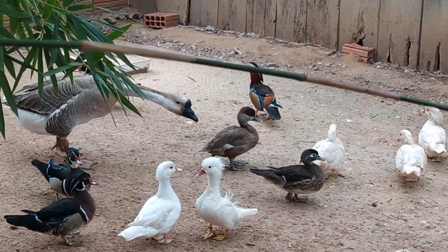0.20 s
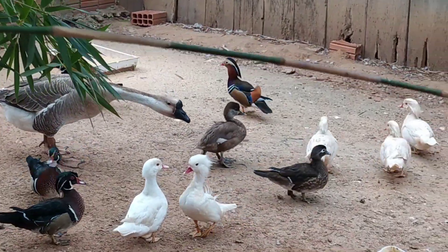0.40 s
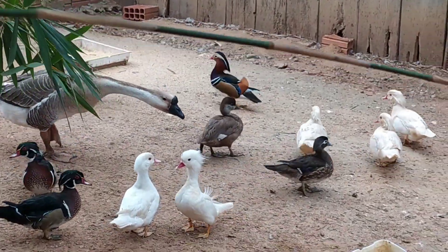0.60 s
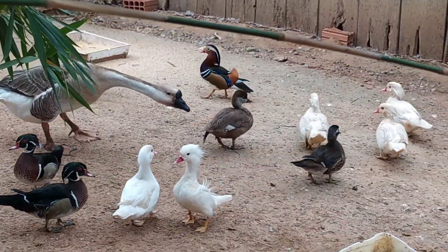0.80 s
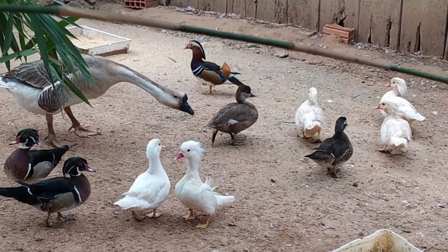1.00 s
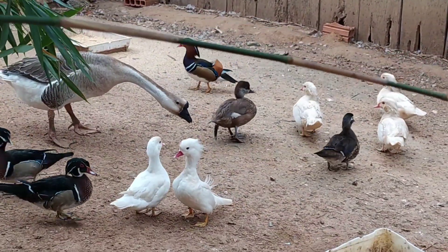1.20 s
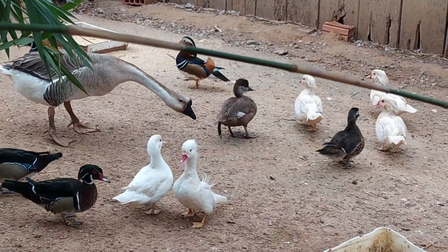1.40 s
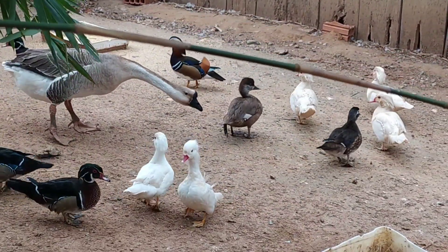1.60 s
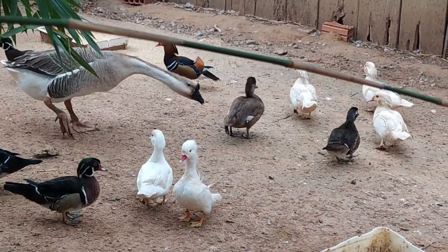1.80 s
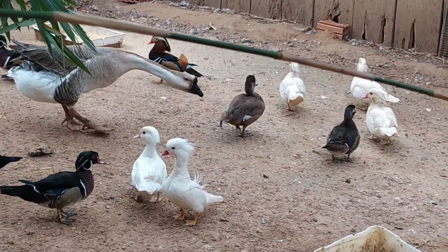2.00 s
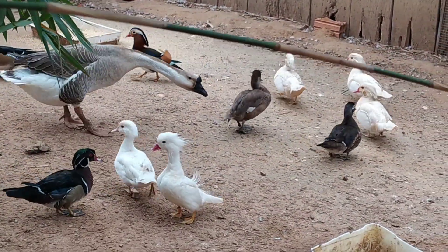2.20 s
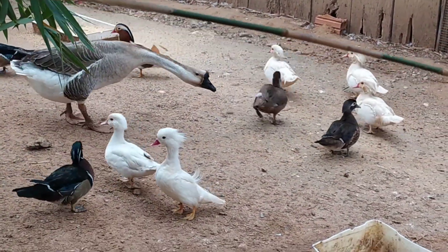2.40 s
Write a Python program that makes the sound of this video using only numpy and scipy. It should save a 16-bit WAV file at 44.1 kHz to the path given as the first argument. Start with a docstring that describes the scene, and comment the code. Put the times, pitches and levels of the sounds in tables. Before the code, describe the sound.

A goose honks loudly and close: from 0.2 to 0.8 s a low grunt cracks into a higher raspy, brassy cry; from 1.5 to 2.25 s another grunt and two cries follow. Very soft rising airy duck whistles come at the start, near 1.5 and 2.4 s. Feet faintly scuff grit around 1.0 and 1.35 s, with sharp ticks near 2.5 s. Quick yard echoes, faint outdoor hush.

```python
"""In a yard, a goose gives five honks in two bouts; each bout is a low grunt that breaks up into a raspy cry.
Pulses of its syrinx (voice organ) and puffs of air ring the narrow resonances of its long windpipe.
Three times a small duck gives a rising whistle, a gliding tone with airy noise, over a soft grunt of low noise.
Feet scuff and tick on the grit, made of short noise bursts. Ground and fence answer with quick echoes
and a faint tail, and a faint hush of coloured noise lies behind."""
import sys
import numpy as np
from scipy import signal
from scipy.fft import rfft, irfft, next_fast_len
from scipy.io import wavfile
from scipy.ndimage import uniform_filter1d, map_coordinates

SR = 44100
rng = np.random.default_rng(int(sys.argv[2]) if len(sys.argv) > 2 else 0)


def transcribe(u):
    """Save the signal u as a 16-bit wav file named by the first command-line argument.

    u: samples, shape (n,) or (channels, n), limited to [-1, 1]; the rate is SR.
    q: integer samples, one column per channel.
    """
    v = np.clip(np.atleast_2d(u).T, -1, 1)
    q = np.round(v * 32767).astype(np.int16)
    wavfile.write(sys.argv[1], SR, q)


N = 114660
T = np.arange(N) / SR  # time in seconds

# Bouts of calling. Each row: start in seconds, end in seconds, base level in dB of the lower resonances,
# of the upper resonances and of the fundamental.
BOUTS = [(.192, .795, -26, -31.5, -39.5), (1.5, 2.226, -24, -34, -44)]
# Honks that swell out of the bouts. Each row: peak time in seconds, rise in seconds, fall in seconds,
# gain in dB of the lower resonances, gain in dB of the upper resonances.
HONKS = [(.328, 0.029, 0.058, 4.5, 12.5), (0.603, 0.1, 0.1, -1, 15.5), (1.644, 0.036, 0.041, 5, 10),
         (1.903, 0.075, 0.11, 4, 13), (2.176, 0.059, 0.057, 2.5, 14.5)]
# How the syrinx beats, one list for each bout. Each row: time in seconds, pitch in Hz, roughness from 0 to 1.
SYRINX = [
    [(.19, 134.4, 0.44), (.235, 163.6, 0.05), (.272, 162.4, 0), (.297, 183.2, 0.32), (.325, 185, 0.34),
     (.36, 169.3, 0.22), (.445, 162.9, 0), (.475, 178.3, 0.3), (.495, 225, 0.18), (.535, 224.3, 0.05),
     (.57, 223.4, 0.17), (.605, 222.4, 0.28), (.645, 223.7, 0.17), (.665, 179.9, 0.2), (.75, 174.4, 0.4),
     (.83, 151.2, 0.81)],
    [(1.5, 143.3, 0.57), (1.55, 155.4, 0.4), (1.62, 166.6, 0.46), (1.7, 160, 0), (1.757, 160.5, 0),
     (1.795, 220.7, 0.08), (1.855, 222.8, 0.07), (1.89, 219, 0.32), (1.935, 219.5, 0.5),
     (1.97, 176.1, 0.06), (2.073, 180.7, 0.06), (2.097, 221.9, 0.1), (2.17, 222, 0.2), (2.2, 185.7, 0.6),
     (2.27, 176.8, 0.7)],
]
# Windpipe resonances. Each row: frequency in Hz, then relative strength in dB in the first grunt,
# first cry, second grunt and second cry.
WINDPIPE = [(541.7, -21, -22.5, -14.5, -15), (864, -10, -9.5, -4.5, 2.5), (974, -7.5, -17, -2, -2.5),
            (1084, 2, -0.5, -2, 5.5), (1358.5, 4.5, 2, -4, 13.5), (1555, 0.5, -19.5, -1.5, -11),
            (1675, -1, 5.5, -14.5, -7.5), (1735, -8.5, -11.5, -12, -5), (1939, -12, -23, -10, -8),
            (2204, -4.5, 3.5, -4.5, -1), (2435, -8, -2.5, -10, -6.5), (2677, -4, 4.5, -1, 0),
            (3026, -1.5, 3, -0.5, -2.5)]
# When the grunt breaks into the cry. One time in seconds for each bout.
BREAK_TIMES = [0.56, 1.785]
# Colour of the raspy air noise. Each row: frequency in Hz, relative level in dB.
RASP_COLOUR = [(2500, -34.5), (3300, 5.5), (4200, 1.5), (5600, -2.5), (7000, -5), (9100, -1),
               (10600, -17.5), (13700, -26), (15500, -53.5)]
# Colour of the soft low buzz of the throat. Each row: frequency in Hz, relative level in dB.
THROAT_COLOUR = [(150, -37), (240, 2.5), (340, -7), (480, -10), (900, -40.5)]
# Clear notes where the voice locks onto one windpipe resonance. Each row: middle in seconds,
# half length in seconds, frequency in Hz, level in dB.
LOCKED_NOTES = [(0.315, 0.028, 1306, -19), (0.325, 0.029, 1094, -20.5), (.494, 0.011, 1650, -19),
                (0.529, 0.033, 1335, -15.5), (.568, .02, 1652, -15.5), (0.597, 0.046, 1341, -14),
                (0.601, 0.021, 2695, -16), (.661, 0.013, 1078, -23.5), (0.727, .035, 1735, -25),
                (1.723, 0.043, 964, -27.5), (1.853, 0.052, 1332, -21), (1.888, 0.017, 2970, -23),
                (2.019, 0.053, 1765, -26.5), (2.099, 0.017, 1102, -22.5), (2.15, 0.036, 1342, -18.5),
                (2.221, 0.043, 563.4, -35.5), (1.968, 0.073, 879, -26)]
# How much later the left microphone hears the goose. Each row: frequency in Hz, lag in seconds.
LEFT_LAG = [(850, -.00004), (1300, .00027), (1650, .00011), (2200, 0)]
# Duck whistles. Each row: start in seconds, base level in dB.
WHISTLES = [(-.045, -57), (1.456, -59.5), (2.411, -59)]
# The glide that every whistle follows. Each row: seconds after the start, pitch in Hz, added level in dB.
GLIDE = [(-.02, 2010, -49), (.012, 2660, 4), (0.046, 3245, 2), (0.107, 4520, 1.5), (.14, 5430, 4.5),
         (0.202, 5080, -8.5)]
# Colour of the air in the whistle. Each row: frequency in Hz, relative level in dB.
WHISTLE_AIR = [(900, -48), (2200, -1.5), (4000, -2.5), (9300, 0), (11500, -31)]
# Colour of the duck's grunt. Each row: frequency in Hz, relative level in dB.
GRUNT_COLOUR = [(90, -38), (165, -5), (280, -6), (600, -59.5)]
# Loudness of the duck's grunt. Each row: seconds after the start, added level in dB.
GRUNT_SHAPE = [(0, -40), (0.027, 4), (.115, 4.5), (.2, -27)]
# Foot scuffs. Each row: peak time in seconds, level in dB, seconds to rise by 20 dB, seconds to die by 60 dB.
SCUFFS = [(1.029, -49.5, 0.109, 0.7), (1.345, -42, 0.0029, 0.15)]
# Ticks of grit. Each row: peak time in seconds, level in dB.
TICKS = [(2.457, -28), (2.481, -35), (2.523, -26.5)]
# Colour of scuffs and ticks. Each row: frequency in Hz, relative level in dB.
GRIT_COLOUR = [(250, -43), (900, -1), (2200, 4), (6800, -14), (9000, 9), (11000, -12), (15500, -10)]
# Colour of the outdoor hush. Each row: frequency in Hz, relative level in dB.
HUSH_COLOUR = [(15, -44), (25, -1), (305, -12.5), (368, -15), (399, -15), (1080, -15), (3720, -21.5),
               (8580, -15.5), (15500, -39)]

# Goose: pulses
JITTER_S, SCATTER_DB = 0.00022, 5  # spread of pulse timing and strength when fully rough
ALTERNATE = 0.38  # strong and weak pulses take turns when the voice is rough
PUFF_SHARPNESS = 0.2  # how far the air swells and fades with each cycle
# Goose: windpipe and bouts
RING_WIDTH_HZ, DRIFT_DB, DRIFT_PER_S = 60, 3, 32
BREAK_S, ATTACK_S, RELEASE_DB_PER_S = 0.0072, 0.016, 292
SWELL_SHAPE = 1.58  # 2 would be a bell curve, 1 a sharp peak
DARKEN = 0.067  # the upper resonances die first at the end of a bout
RASP_DB, THROAT_DB = -42, -52  # base levels, before the honks change them
LOCK_WAVER, LEFT_DB = 0.005, 1.0  # waver as a share of pitch; left is raised and right lowered by LEFT_DB
# Duck: waver as a share of pitch, and levels added to the base level of each whistle
WHISTLE_WAVER = 0.0257 + 0.05
OVERTONE_DB, WHISTLE_AIR_DB, GRUNT_DB = -19.5, 3, 6  # the overtone is relative to the main tone
# Feet and yard
TICK_RISE_S, TICK_T60_S = 0.00048, 0.0055  # seconds to rise by 20 dB and to die by 60 dB
WALLS_DB, WALLS_T60_S, TAIL_DB, TAIL_T60_S = -7, 0.11, -24, 0.78
HUSH_DB = -54.5
# Recorder
CEILING, TOP_HZ = 0.97, 15700


def amp(db):
    """Decibels to gain."""
    return 10 ** (np.asarray(db) / 20)


def unit(x):
    """Scale to an average (rms) level of 1."""
    return x / np.sqrt(np.mean(x ** 2) + 1e-20)


def along(points, hz):
    """Read a curve of (Hz, value) points, with frequency on a log axis."""
    f, v = np.transpose(points)
    return np.interp(np.log(hz + 1), np.log(f + 1), v)


def gain_curve(s, db):
    """Gain through (seconds, dB) points, silent outside them, with softened edges."""
    inside = (T >= s[0]) * (T <= s[-1])
    return uniform_filter1d(amp(np.interp(T, s, db)) * inside, size=128)


def wobble(rate):
    """A smooth random curve with a new random value `rate` times a second."""
    return map_coordinates(rng.standard_normal(8192), [T * rate + 2], mode="wrap")


def filtered(x, response):
    """Pass x through a filter given as a function of frequency."""
    m = next_fast_len(N + SR // 2)
    return irfft(rfft(x, m) * response(np.fft.rfftfreq(m, 1 / SR)), m)[..., :N]


def coloured(x, colour):
    """Give x the colour of a (Hz, dB) table, at rms 1."""
    return unit(filtered(x, lambda f: amp(along(colour, f))))


def noise(colour, channels=1):
    """Coloured noise of rms 1."""
    return coloured(rng.standard_normal((channels, N)), colour)


def resonance(f, hz, width):
    """Response of one resonance: strongest at hz, narrow when width is small."""
    return 1j * f * width / (hz * hz - f * f + 1j * f * width)


def steady(x):
    """Even out the slow level changes of x to about rms 1."""
    power = uniform_filter1d(uniform_filter1d(x * x, size=900), size=900)
    return x / np.sqrt(np.abs(power) + 1e-4 * np.mean(x * x))


def goose():
    """Both bouts and the clear notes, reaching two microphones a moment apart that varies with frequency."""
    sides = np.array([[1], [-1]])  # left, right
    voice = bout(0) + bout(1) + locked_notes()
    # each side is shifted by half the lag, in opposite directions
    lag = lambda f: np.exp(-1j * np.pi * f * along(LEFT_LAG, f) * sides)
    return amp(LEFT_DB * sides) * filtered(voice, lag)


def bout(index):
    """A run of honks: the windpipe's colour shifts as the grunt breaks into the cry."""
    start, end, low_db, high_db, hum_db = BOUTS[index]
    gate, low_swell, high_swell = effort(start, end)
    pulses, puffs, rough = syrinx(SYRINX[index])
    air = np.clip(0.25 + rough, 0, 1)  # a rougher voice is breathier
    source = np.sqrt(1 - air ** 2) * pulses + air * puffs
    cry = np.clip((T - BREAK_TIMES[index]) / BREAK_S + 0.5, 0, 1)  # 0 in the grunt, 1 in the cry

    def ring(modes):
        grunt_sound = windpipe(source, modes, 2 * index)
        cry_sound = windpipe(source, modes, 2 * index + 1)
        return steady((1 - cry) * grunt_sound + cry * cry_sound)

    low = ring(WINDPIPE[:5]) * amp(low_db + low_swell)
    high = ring(WINDPIPE[5:]) * amp(high_db + high_swell) * gate ** DARKEN
    # a strained honk is raspier and loses its fundamental
    rasp = coloured(puffs, RASP_COLOUR) * amp(RASP_DB + high_swell)
    hum = filtered(pulses, lambda f: resonance(f, hz=171.0, width=29.0) ** 2)
    hum = hum / np.std(hum[(T > start) & (T < end)]) * amp(hum_db - low_swell)
    throat = coloured(source, THROAT_COLOUR) * amp(THROAT_DB - low_swell)
    return gate * (low + high + rasp + hum + throat)


def effort(start, end):
    """Gate of one bout, and the dB that the honks add to the lower and upper resonances."""
    attack = np.clip((T - start) / ATTACK_S, 0, 1) ** 0.5
    gate = attack * amp(-RELEASE_DB_PER_S * np.maximum(T - end, 0))
    swells = []
    for peak, rise, fall, _, _ in HONKS:
        distance = np.abs((T - peak) / np.where(T < peak, rise, fall))
        swells.append(np.exp(-distance ** SWELL_SHAPE))
    *_, low_db, high_db = np.transpose(HONKS)
    return gate, low_db @ np.array(swells), high_db @ np.array(swells)


def syrinx(rows):
    """Uneven pulses at the pitch, a puff of air with each, and the roughness that scatters the pulses."""
    s, hz, rough = np.transpose(rows)
    rough = np.clip(np.interp(T, s, rough), 0, 1)
    pitch = np.interp(T, s, hz) * (1 + 0.0066 * wobble(70))
    cycles = np.cumsum(pitch) / SR
    number = np.arange(1, int(cycles[-1]))
    times = np.interp(number, cycles, T)  # one pulse as each cycle completes
    late, strong = rng.standard_normal((len(times), 2)).T
    r = np.interp(times, T, rough)
    at = (times + JITTER_S * r * late) * SR
    # a short windowed sinc places each pulse between samples
    taps = at.astype(int)[:, None] + np.arange(-7, 9)
    d = taps - at[:, None]
    shape = np.sinc(d) * np.cos(np.pi * d / 16) ** 2
    turns = 1 + np.clip(ALTERNATE * r, 0, 1) * (-1) ** number
    size = amp(SCATTER_DB * np.sqrt(r) * strong) * turns
    pulses = np.bincount(np.clip(taps, 0, N - 1).ravel(), (shape * size[:, None]).ravel(), N)
    puffs = rng.standard_normal((2, N)) * np.exp(PUFF_SHARPNESS * np.cos(2 * np.pi * cycles))
    return unit(pulses), unit(puffs), rough


def windpipe(source, modes, column):
    """The source rings a group of tube resonances that drift in strength; steep skirts cut the rest."""
    lo, hi = modes[0][0] * 0.58, modes[-1][0] * 0.92
    source = filtered(source, lambda f: (1 - 1 / (1 + (f / lo) ** 4)) / (1 + (f / hi) ** 8))
    total = 0
    for k, mode in enumerate(modes):
        gain = (-1) ** k * amp(mode[1 + column]) * amp(DRIFT_DB * wobble(DRIFT_PER_S))  # signs alternate
        total = total + gain * filtered(source, lambda f: resonance(f, mode[0], RING_WIDTH_HZ))
    return total


def locked_notes():
    """Nearly pure, slightly wavering notes that ring out where the voice locks onto a resonance."""
    total = np.zeros(N)
    for middle, half, hz, db in LOCKED_NOTES:
        phase = 2 * np.pi * np.cumsum(hz * (1 + LOCK_WAVER * wobble(120))) / SR
        total += amp(db) * np.exp(-((T - middle) / half) ** 4) * unit(np.sin(phase))
    return total


def duck():
    """An airy whistle, a tone whose pitch sweeps upward, over a soft grunt of low noise."""
    out = np.zeros((2, N))
    s, hz, db = np.transpose(GLIDE)
    grunt_s, grunt_db = np.transpose(GRUNT_SHAPE)
    for start, level in WHISTLES:
        pitch = np.interp(T, start + s, hz) * (1 + WHISTLE_WAVER * wobble(900))
        phase = 2 * np.pi * np.cumsum(pitch) / SR
        tone = unit(np.sin(phase) + amp(OVERTONE_DB) * np.sin(2 * phase))
        tone = tone * amp(1.7 * wobble(220) + 5.0)  # the tone flutters in level
        air = amp(WHISTLE_AIR_DB) * noise(WHISTLE_AIR, channels=2)
        out += gain_curve(start + s, level + db) * (tone + air)
        out += gain_curve(start + grunt_s, level + grunt_db + GRUNT_DB) * noise(GRUNT_COLOUR)
    return out


def feet():
    """Scuffs and sharp ticks on grit: noise that rises quickly and dies away."""
    def burst(s, db, rise, t60):
        return amp(db - 60 * np.maximum(T - s, 0) / t60 - 20 * np.maximum(s - T, 0) / rise)

    scuffs = sum(burst(*row) for row in SCUFFS) * amp(2.7 * wobble(380))  # a gritty flutter
    ticks = sum(burst(s, db, TICK_RISE_S, TICK_T60_S) for s, db in TICKS)
    return (scuffs + ticks) * noise(GRIT_COLOUR, channels=2)


def yard(x):
    """Quick answers of ground and fence, then a faint open-air tail, as fading random echoes."""
    t = T[:SR]
    tail = rng.standard_normal((2, SR)) * amp(-60 * t / TAIL_T60_S)
    # cubing lets a few strong echoes stand out
    walls = rng.standard_normal((2, SR)) ** 3 * amp(-60 * t / WALLS_T60_S)
    answer = 0
    for db, echoes in [(WALLS_DB, walls), (TAIL_DB, tail)]:
        answer = answer + amp(db) * echoes / np.linalg.norm(echoes, axis=1, keepdims=True)
    return x + signal.fftconvolve(x, answer, axes=1)[:, :N]


def hush():
    """Faint outdoor noise, partly shared by both sides, that wavers in level."""
    both = unit(noise(HUSH_COLOUR, channels=2) + 0.94 * noise(HUSH_COLOUR))
    return both * amp(HUSH_DB + 2.54 * wobble(10.87))


def scene():
    """The birds and feet in the yard over a faint outdoor hush."""
    return yard(goose() + duck() + feet()) + hush()


def record(dry):
    """The recorder rounds off the highest peaks and keeps nothing above its band limit."""
    rounded = dry / (1 + (dry / CEILING) ** 8) ** (1 / 8)
    return filtered(rounded, lambda f: f < TOP_HZ)


dry = scene()
out = record(dry)
transcribe(out)
```